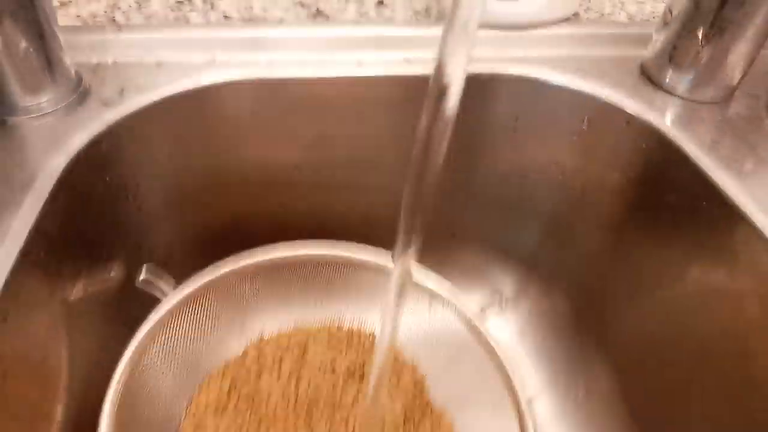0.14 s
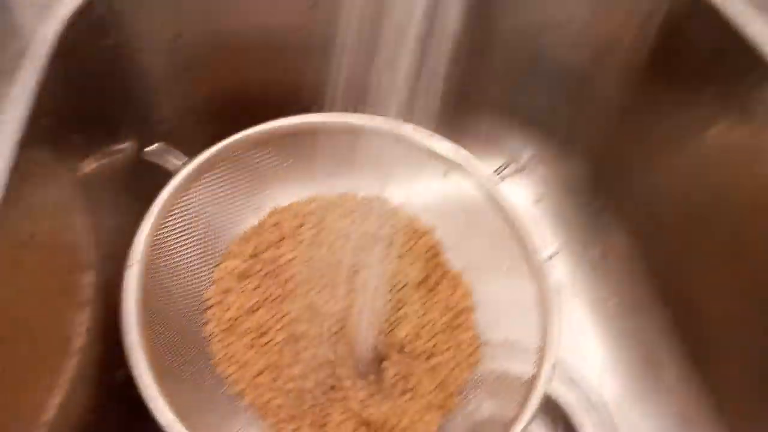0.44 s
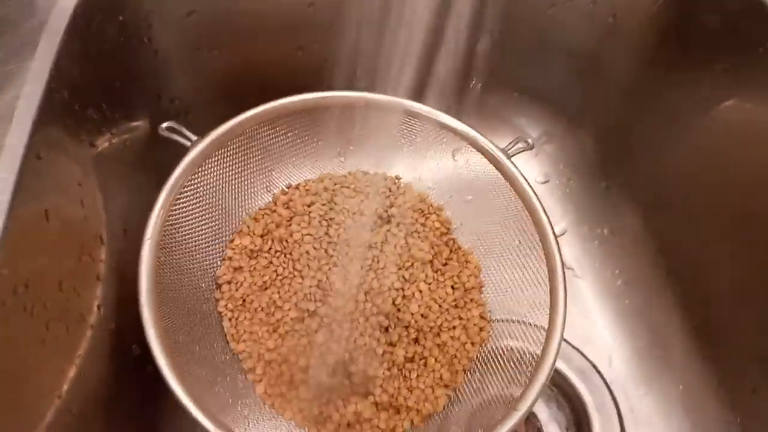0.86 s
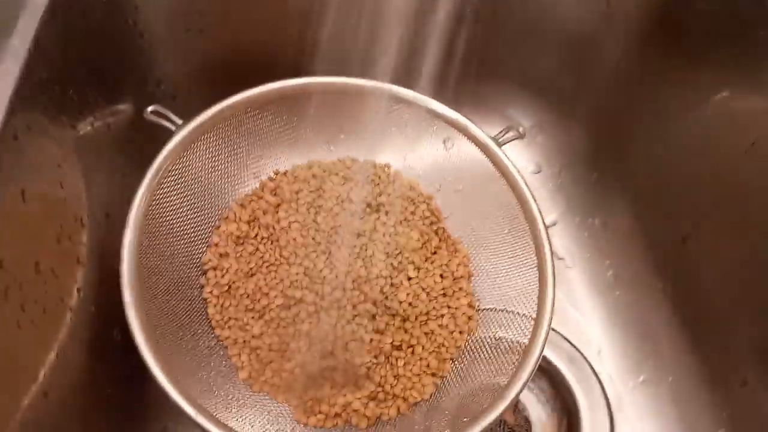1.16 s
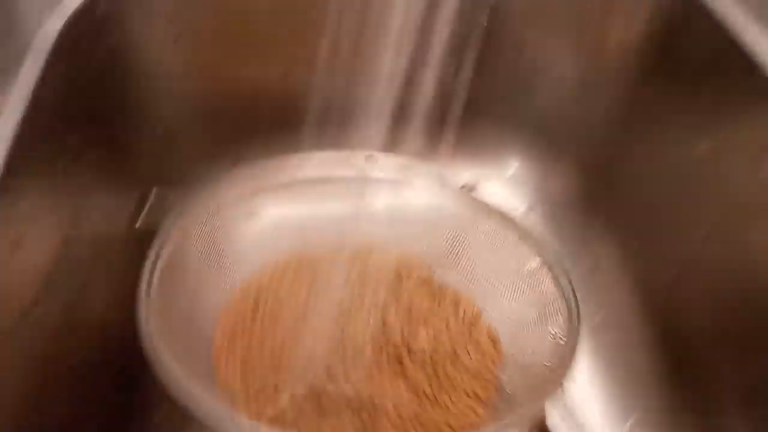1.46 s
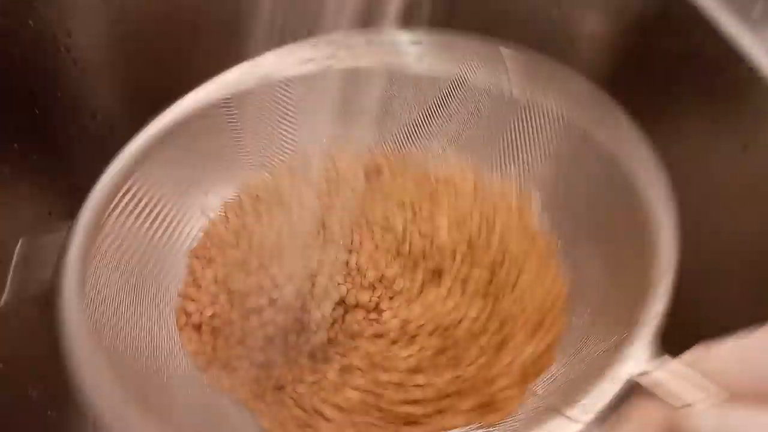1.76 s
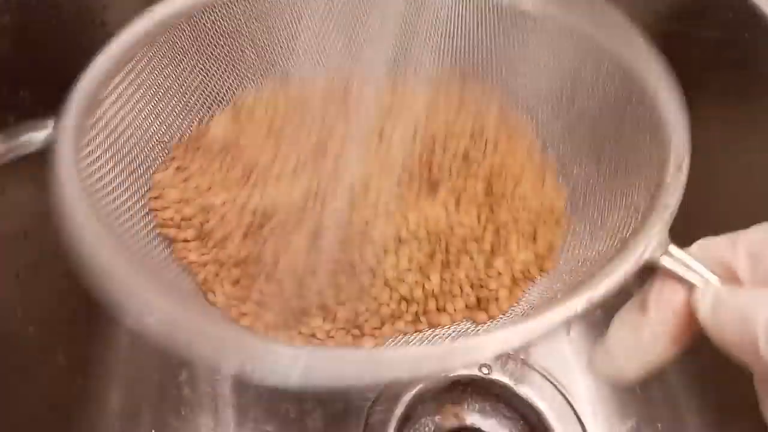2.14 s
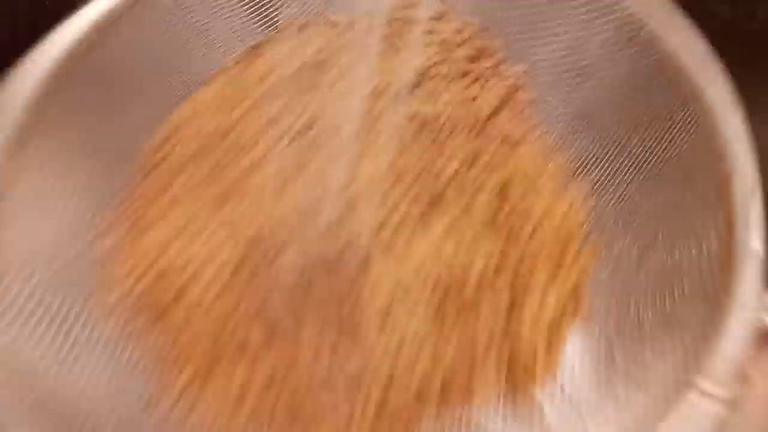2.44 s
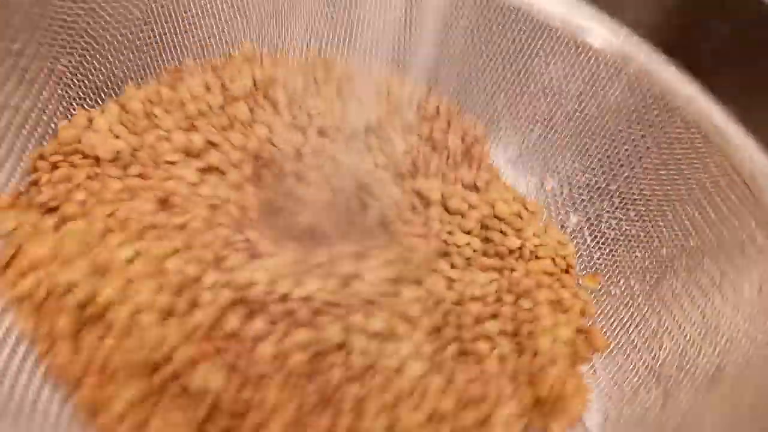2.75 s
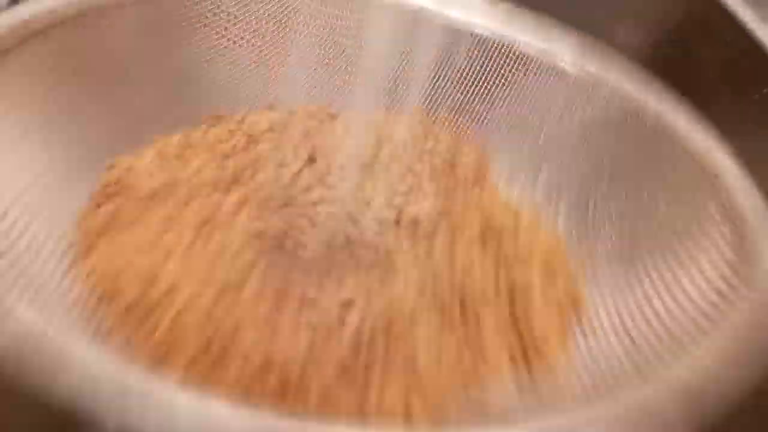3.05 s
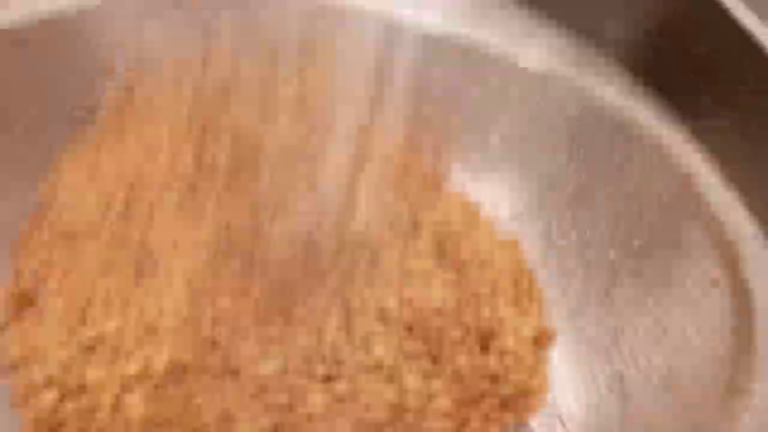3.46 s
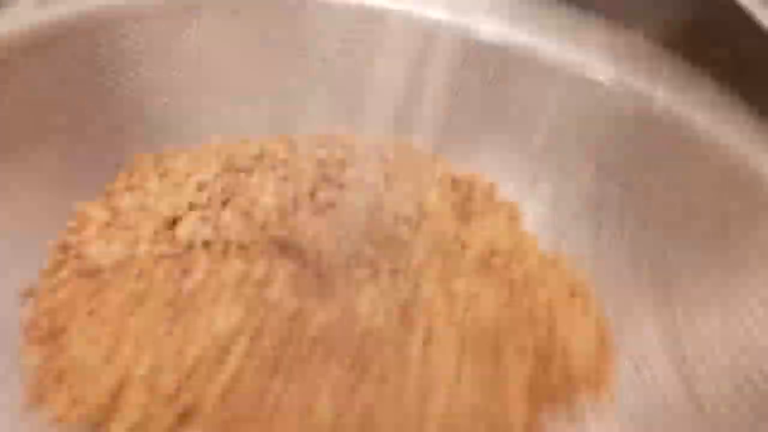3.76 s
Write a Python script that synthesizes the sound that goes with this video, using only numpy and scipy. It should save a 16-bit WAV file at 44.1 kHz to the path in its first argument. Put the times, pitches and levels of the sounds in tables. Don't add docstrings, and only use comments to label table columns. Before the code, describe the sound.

Running tap water bursts from thin stream into dense spray, hissing on wet lentils and mesh

```python
import sys
import numpy as np
from scipy import signal
from scipy.fft import rfft, irfft
from scipy.io import wavfile
from scipy.ndimage import uniform_filter1d, map_coordinates

SR = 44100
rng = np.random.default_rng(int(sys.argv[2]) if len(sys.argv) > 2 else 0)


def magnitude_from_level(level_db):
    exponent = np.asarray(level_db, float) / 20
    return 10 ** exponent


def waveform_to_disk(signal):
    frames = np.transpose(np.atleast_2d(signal))
    scaled = np.clip(frames, -1, 1) * 32767
    samples = np.round(scaled).astype(np.int16)
    wavfile.write(sys.argv[1], SR, samples)


N = 171990
T = np.arange(N) / SR
F = np.arange(N // 2 + 1) * SR / N + 1e-3
SPRAY_ON_S, SPRAY_RISE_S = 0.184, 0.0025

# [t/s, level/dB]
STREAM_LEVEL = [
    (0, -30),
    (.02, -30.5),
    (.05, -35.5),
    (.12, -35),
    (.15, -34.5),
    (.18, -33.5),
    (.2, -27),
]
# [t/s, level/dB, nearness of the strainer 0-1]
SPRAY_FLOW = [(.2, -27.5, 0), (.4, -27.5, 0.57), (.6, -26.5, 0.36), (.85, -26.5, 0.52), (1.1, -27.5, 0.15),
              (1.3, -26.5, 0.32), (1.5, -26, 0.45), (1.7, -27.5, 0.64), (1.95, -26, 0.63),
              (2.15, -26, 0.74), (2.4, -25.5, 0.6), (2.6, -28, 1), (2.85, -25, 0.92), (3.05, -27.5, 0.95),
              (3.3, -27, 0.78), (3.5, -26.5, 0.83), (3.7, -25, 0.92), (3.9, -26.5, 0.53)]
# [t/s, level/dB, length/s]
JET_SURGES = [(0.186, 10, 0.004), (0.198, -13, 0.0047), (0.346, 4, 0.023), (0.316, -3, 0.022),
              (0.79, -2, 0.087), (1.083, -5, 0.023), (1.38, 2, 0.038), (1.682, -2, 0.02), (1.818, -3, 0.01),
              (1.874, 3, 0.022), (1.917, -3.5, 0.046), (2.21, -2, 0.054), (2.391, -5.5, 0.053),
              (2.69, 3.5, 0.025), (2.82, -4, 0.061), (3.11, -2, 0.012), (3.141, 6.5, 0.034),
              (3.19, 0, 0.03), (3.254, 5.5, 0.035), (3.568, -3, 0.045), (3.627, 0, 0.027),
              (3.706, -4.5, .03), (3.794, -3.5, 0.018)]
# [f/Hz, share 0-1]
SURGE_SHARE = [(200, .7), (1000, .9), (4000, .85), (8000, .7), (16000, .55)]
# [f/Hz, level/dB per Hz]
SPRAY_COLOUR = [(200, -3), (500, -13), (1000, -11.5), (2000, -10.5), (4000, -3.5), (6700, 0), (10000, -2.5),
                (16000, -5)]
# [f/Hz, level/dB per Hz]
STREAM_COLOUR = [(200, 7), (600, -9), (1500, -5), (3000, -12), (5000, -7.5), (8600, -16), (9300, -14.5),
                 (16000, -23)]
# [f/Hz, level/dB]
NEAR_COLOUR = [(300, -1), (1500, 3), (3500, 5.5), (6700, 0.5), (11000, -4), (16000, 3)]
# [f/Hz, share 0-1]
COMMON_SHARE = [(100, .9), (300, .7), (700, .5), (1500, .48), (3000, .4), (6000, .32), (10000, .22),
                (16000, .14)]
# [f/Hz, width/Hz, level/dB]
MESH_MODES = [(724, 48, -64.5), (980, 110, -63.5), (1312, 160, -58), (2656, 270, -68), (3290, 310, -58),
              (3570, 510, -59)]
# [f/Hz, width/Hz, level/dB over the stream]
STREAM_RINGS = [(3080, 300, -13), (8400, 1500, -14)]
# [f/Hz, t60/s, level/dB]
BASIN_MODES = [(83.6, 0.06, -44.5), (104, 0.22, -49), (156, 0.54, -60), (194, 0.32, -65), (210, 0.14, -73),
               (270, 0.083, -80), (328, 0.13, -58), (510, 0.66, -57), (697, 0.33, -73), (971, 0.35, -65)]
# [f/Hz, level/dB]
RUMBLE_COLOUR = [(20, -50), (35, -32), (55, -16), (80, 1), (130, -1), (200, -13.5), (450, -27), (900, -65)]
# [multiple of the shaft, level/dB, throb depth 0-1]
MOTOR_ORDERS = [(4, -62, .1), (6, -55, .1), (7.17, -59, .1), (8, -53, .3), (11, -60, .1), (12, -42, .8),
                (13, -61, .1), (15, -56, .2), (16.2, -59, .1), (20.1, -62, .1)]
# [t/s, level/dB, f/Hz, t60/s]
KNOCKS_AND_PINGS = [(1.358, -33, 697, 0.19), (1.41, -36.5, 688, 0.16), (1.432, -35, 702, 0.43),
                    (2.125, -38.5, 697, 0.4), (.008, -35, 3050, 0.063), (.018, -39, 3150, 0.03),
                    (.139, -34, 3080, 0.036), (.149, -36, 3110, .03), (0.166, -30, 3040, 0.033),
                    (.347, -26.5, 3050, 0.057), (1.869, -30.5, 515, 0.14), (2.076, -23, 322, 0.071),
                    (2.077, -25, 411, 0.087), (2.078, -29, 570, 0.084), (2.2, -37.5, 328, 0.21),
                    (2.69, -37.5, 900, .1), (2.962, -28, 322, 0.087), (3.199, -29, 330, 0.18),
                    (3.24, -38, 510, .15), (3.681, -31, 331, 0.32)]
# [t/s, level/dB, f/Hz, t60/s]
SPLASH_HITS = [(0.021, -12, 3670, 0.012), (0.096, -17.5, 3430, 0.03), (0.27, -19.5, 3600, 0.06),
               (3.8096, -7, 6600, .01), (2.4203, -4, 13200, .01), (2.9, -8, 7000, 0.0089),
               (3.853, -4, 6700, .01), (1.15, -11, 4200, .012), (1.39, -17, 5000, .01),
               (1.583, -17, 3000, .01), (3.605, -14, 7500, .04), (0.541, -21, 2500, 0.02),
               (1.882, -6, 4450, 0.0072), (2.078, -8, 7000, .015), (2.3, -10, 3600, .015)]
# [t/s, length/s]
RATTLE_TIMES = [(.63, .12), (1.0, .15), (1.372, .025), (1.375, .02), (1.43, .03), (1.55, .05), (1.89, .04),
                (2.04, .02), (2.1, .012), (2.57, .03), (2.68, .05), (2.7, .03), (2.95, .04), (3.15, .04),
                (3.61, .03)]
# [level/dB, f/Hz]
RATTLE_RINGS = [(-52, 1290), (-48, 1500), (-40, 1600), (-48, 1010), (-44, 1520), (-46, 2660), (-54, 1000),
                (-46, 2510), (-36, 1200), (-46, 1200), (-44, 2600), (-49, 940), (-45, 2500), (-53, 1100),
                (-38, 7050)]
# [level/dB, top f/Hz, t60/s]
HARD_THUD = (-25, 2600, 0.17)
# [t/s, lag/ms]
LEFT_LAG = [
    (0, 1.0),
    (.5, 1.0),
    (.75, 1.065),
    (1.2, 1.02),
    (1.7, 1.09),
    (2.2, 1.134),
    (3.9, 1.134),
]
# [f/Hz, level/dB]
LEFT_PORT = [(1000, -2.5), (2400, 6), (5500, -1), (6700, 6), (8500, 3), (11000, -8), (13800, -7.5),
             (14700, 4)]
# [f/Hz, level/dB]
RIGHT_PORT = [(1000, -5), (2400, -1), (6600, -1.5), (8000, -8.5), (9500, -1), (11500, 7.5), (13900, -3.5),
              (14700, 9)]


def unit(x):
    return x / np.sqrt(np.mean(x ** 2))


def over_hz(table, hz):
    points = np.array(table)
    return np.interp(np.log(hz), np.log(points[:, 0]), points[:, 1])


def over_time(table, column=1):
    points = np.array(table)
    return np.interp(T, points[:, 0], points[:, column])


def shape(x, gain):
    return irfft(rfft(x) * gain, N)


def smooth_twice(x, k):
    return uniform_filter1d(uniform_filter1d(x, k), k)


def noise():
    return rng.standard_normal(N)


def ring(x, hz, t60):
    r = np.exp(-np.log(1000) / (t60 * SR))
    turn = 2 * np.pi * hz / SR
    return signal.lfilter([np.sin(turn)], [1, -2 * r * np.cos(turn), r * r], x)


def walk(rate):
    step = 30
    k = max(int(SR / step / rate), 2)
    held = np.repeat(rng.standard_normal(N // step // k + 2), k)
    coarse = smooth_twice(held, k)
    return np.interp(T, np.arange(len(coarse)) * step / SR, unit(coarse))


def hum(hz, width, drift):
    phase = 2 * np.pi * np.cumsum(hz * (1 + drift * walk(3))) / SR
    slow = smooth_twice(rng.standard_normal((3, 2, N)), int(SR / width))
    x = slow[:, 0] * np.cos(phase) + slow[:, 1] * np.sin(phase)
    return unit(x[:2] + x[2])


def bell(s, width):
    return np.exp(-((T - s) / width) ** 2)


def die_away(s, t60):
    return (T >= s) * magnitude_from_level(-60 * np.abs(T - s) / t60)


def spray_on():
    return np.clip((T - SPRAY_ON_S) / SPRAY_RISE_S, 0, 1)


def surges():
    return sum(db * bell(s, width) for s, db, width in JET_SURGES)


def droplets():
    drops_per_s, scatter_db, click_db, spatter_db = 3000, 3, -5, 1.06
    hit = rng.random(N) < drops_per_s / SR
    size_db = np.minimum(scatter_db * rng.exponential(size=N), 14)
    clicks = hit * magnitude_from_level(size_db) * np.sign(noise())
    spatter = magnitude_from_level(spatter_db * (walk(70) + walk(250)))
    return unit((noise() + magnitude_from_level(click_db) * unit(clicks)) * spatter)


def water():
    swell_db, neighbour_db, flicker_db, near_pan_db = 0.35, 0.65, 1.5, -7
    on = spray_on()
    near = over_time(SPRAY_FLOW, 2) - 0.5
    jet_db, surge_db = over_time(SPRAY_FLOW), surges()
    thin = (1 - on) * magnitude_from_level(over_time(STREAM_LEVEL))
    share = np.clip(over_hz(COMMON_SHARE, F), 0, 1)
    common = rfft(droplets())
    ports = np.array([np.sqrt(share) * common + np.sqrt(1 - share) * rfft(droplets()) for _ in range(2)])
    spray_norm, stream_norm = [np.sqrt(np.mean(magnitude_from_level(2 * over_hz(colour, F))))
                               for colour in (SPRAY_COLOUR, STREAM_COLOUR)]
    centres = 200 * 2 ** (np.arange(20) / 3)
    slow = [walk(20) for _ in centres[::3]] + [0]
    swell = swell_db * (walk(25.18) + walk(60))
    out = 0
    for k, hz in enumerate(centres):
        window = np.cos(np.pi / 2 * np.clip(3 * np.log2(F / hz), -1, 1)) ** 2
        band = irfft(ports * window, N)
        a = k % 3 / 3
        neighbours = (1 - a) * slow[k // 3] + a * slow[k // 3 + 1]
        flicker = np.array([walk(29.97), walk(29.82)])
        wander_db = swell + neighbour_db * neighbours + flicker_db * flicker
        pan_db = near_pan_db * near * np.clip(np.log2(hz / 3000), 0, 1) * np.array([[0.5], [-0.5]])
        colour_db = over_hz(SPRAY_COLOUR, hz) + near * over_hz(NEAR_COLOUR, hz)
        spray_db = jet_db + surge_db * over_hz(SURGE_SHARE, hz) + colour_db + pan_db
        spray = on * magnitude_from_level(spray_db) / spray_norm
        stream = thin * magnitude_from_level(over_hz(STREAM_COLOUR, hz)) / stream_norm
        out = out + band * magnitude_from_level(wander_db) * (spray + stream)
    return magnitude_from_level(3.5) * out


def mesh():
    swell_db = 2.5
    thin = sum(magnitude_from_level(db + swell_db * walk(37)) * hum(hz, width, 0.0099) for hz, width, db in STREAM_RINGS)
    jet = sum(magnitude_from_level(db + swell_db * walk(7.7)) * hum(hz, width, 0.03) for hz, width, db in MESH_MODES)
    on = spray_on()
    return on * jet + (1 - on) * thin * magnitude_from_level(over_time(STREAM_LEVEL))


def runoff():
    rumble_db, low_cut_hz = -47.5, 83
    drum = sum(magnitude_from_level(db) * unit(ring(noise(), hz, t60)) for hz, t60, db in BASIN_MODES)
    rumble = magnitude_from_level(rumble_db) * unit(shape(noise(), magnitude_from_level(over_hz(RUMBLE_COLOUR, F))))
    uneven = magnitude_from_level(2.1 * walk(8.2))
    return shape((drum + rumble) * uneven, 1 / (1 + (low_cut_hz / F) ** 4))


def motor():
    shaft_hz, throb_hz, throb_low_s = 12.677, 2.655, 0.18
    level_db, wobble_db = 2.5, -1
    throb = np.abs(np.sin(np.pi * throb_hz * (T - throb_low_s)))
    out = np.zeros(N)
    for order, db, depth in MOTOR_ORDERS:
        level = np.sqrt(2) * magnitude_from_level(db + level_db + wobble_db * walk(4.56))
        tone = np.sin(2 * np.pi * (order * shaft_hz * T + rng.random()))
        out += level * (1 - depth + depth * throb) * tone
    return out


def bubbles():
    per_s, middle_hz, level_db, cycles = 90, 2000, -54, 14
    out = np.zeros((2, N))
    rows = rng.random((400, 4))
    for moment, pitch, loudness, pan in rows[:int(per_s * N / SR)]:
        hz = middle_hz * 2 ** (3 * pitch - 1.5)
        i = int(moment * N)
        c = np.arange(min(N - i, 2000)) / SR * hz / cycles
        chirp = np.sin(2 * np.pi * cycles * c * (1 + 0.031 * c)) * np.exp(-3 * c) * magnitude_from_level(8 * loudness)
        out[:, i:i + len(c)] += chirp * np.array([[np.sqrt(pan)], [np.sqrt(1 - pan)]])
    return magnitude_from_level(level_db) * unit(out)


def knocks_and_pings():
    out = np.zeros(N)
    for s, db, hz, t60 in KNOCKS_AND_PINGS:
        blow = bell(s, 0.0024) * np.sin(2 * np.pi * hz * T)
        mode = ring(blow, hz, t60)
        out += magnitude_from_level(db) * mode / np.abs(mode).max()
    return out


def splashes():
    out = np.zeros(N)
    for s, db, hz, t60 in SPLASH_HITS:
        burst = ring(noise(), hz, 30 / hz)
        out += magnitude_from_level(db - 11) * unit(burst) * die_away(s, t60)
    return out


def rattles():
    out = np.zeros((2, N))
    for (s, width), (db, hz) in zip(RATTLE_TIMES, RATTLE_RINGS):
        out += magnitude_from_level(db) * hum(hz, hz / 2.5, 0.01) * bell(s, width)
    return out


def thud():
    db, top_hz, t60 = HARD_THUD
    gain = np.clip(F / 250, 0, 1) ** 2 / (1 + (F / top_hz) ** 2)
    return magnitude_from_level(db) * unit(shape(noise(), gain)) * die_away(2.077, t60)


def scene():
    duck_db, duck_s, bass_pan_db, basin_surge = 10, 0.0076, 1.5, 0.3
    before = magnitude_from_level(duck_db * np.clip((SPRAY_ON_S - T) / duck_s, 0, 1))
    pan = magnitude_from_level(bass_pan_db * np.array([[0.5], [-0.5]]))
    low = (runoff() + motor()) * before * magnitude_from_level(basin_surge * surges()) * pan
    both = water() + mesh() + low + bubbles() + knocks_and_pings() + splashes() + rattles() + thud()
    late = T - over_time(LEFT_LAG) / 1000
    left = map_coordinates(both[0], [late * SR], order=5, mode="mirror")
    return np.array([left, both[1]])


def band_limit(x):
    return signal.sosfilt(signal.butter(12, 15790, fs=SR, output="sos"), x)


def record(dry):
    ports = np.array([shape(x, magnitude_from_level(over_hz(port, F))) for x, port in zip(dry, (LEFT_PORT, RIGHT_PORT))])
    top_cut = signal.ellip(14, 0.2, 52, 15720, fs=SR, output="sos")
    mix = signal.sosfilt(top_cut, ports)
    return band_limit(mix)


dry = scene()
out = record(dry)
waveform_to_disk(out)
```